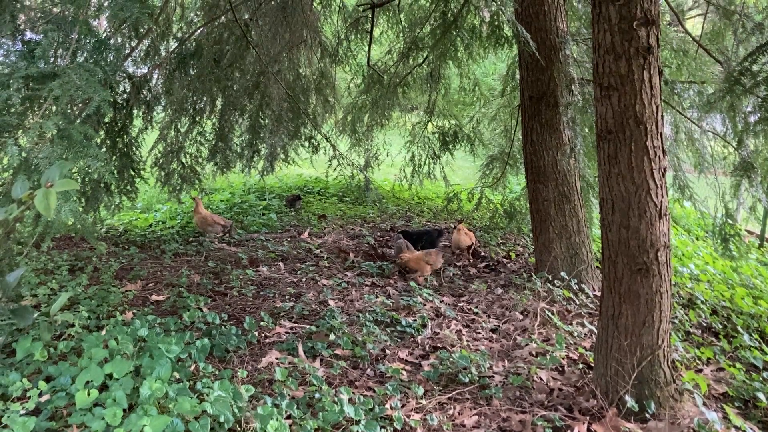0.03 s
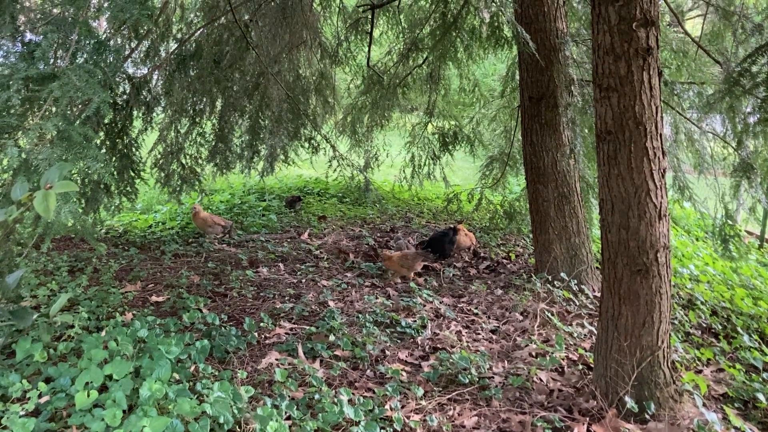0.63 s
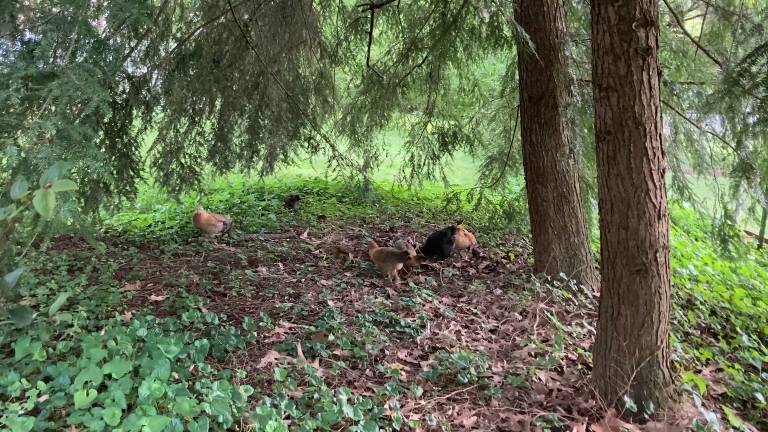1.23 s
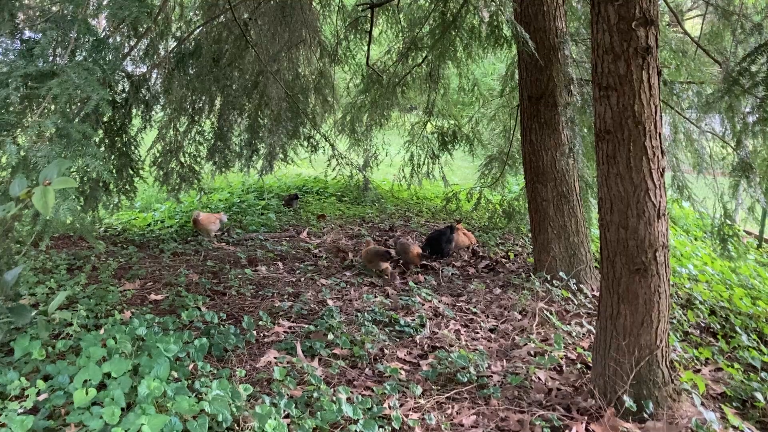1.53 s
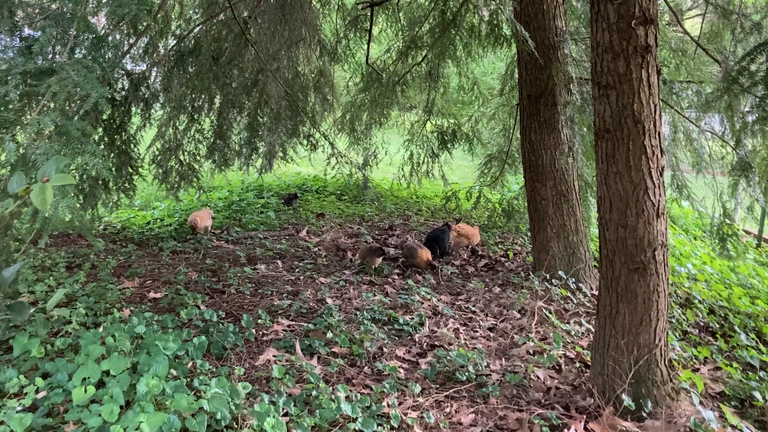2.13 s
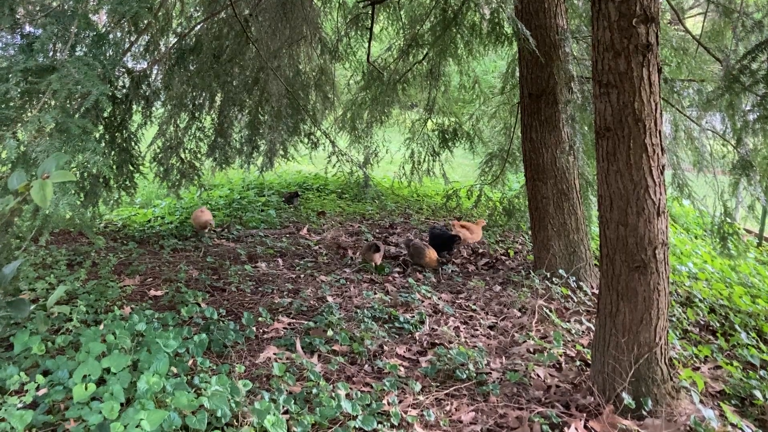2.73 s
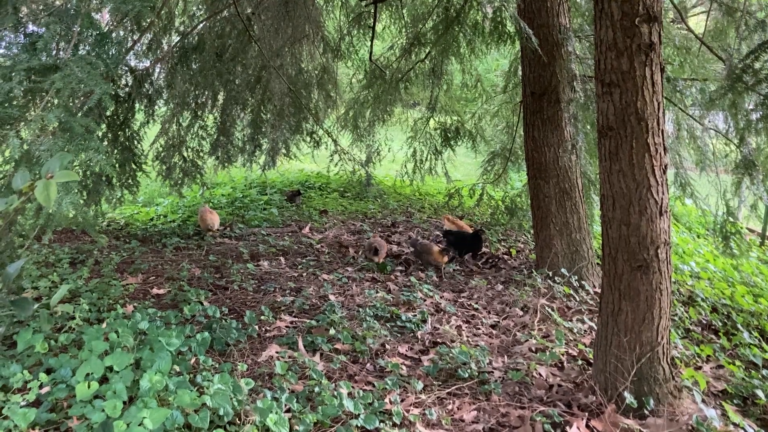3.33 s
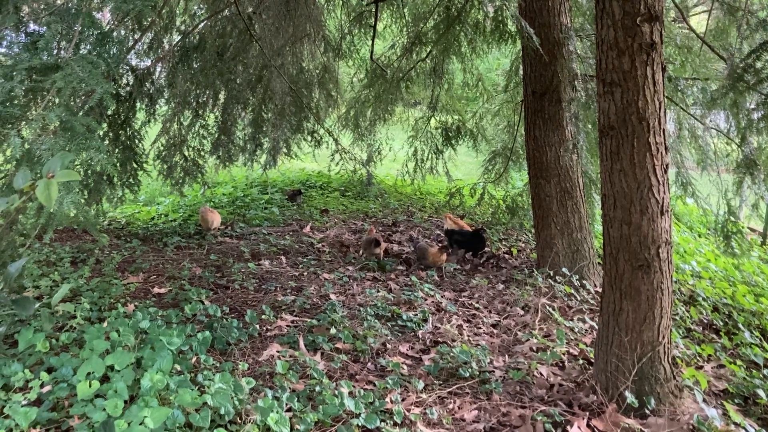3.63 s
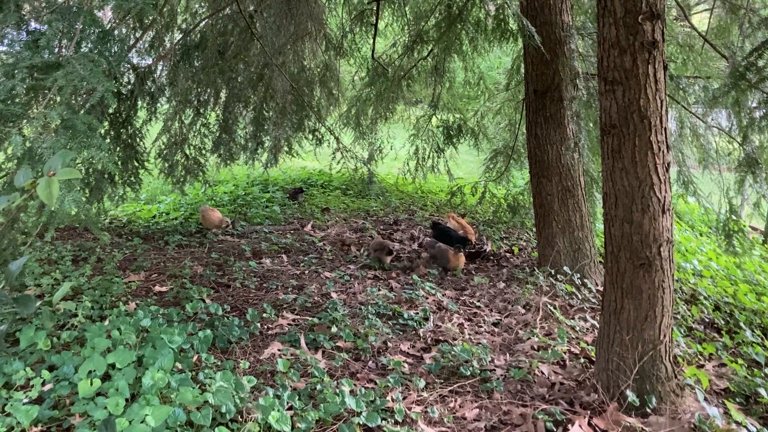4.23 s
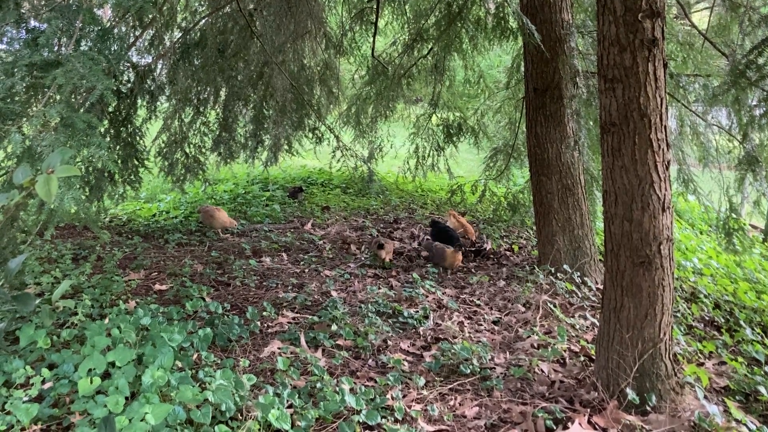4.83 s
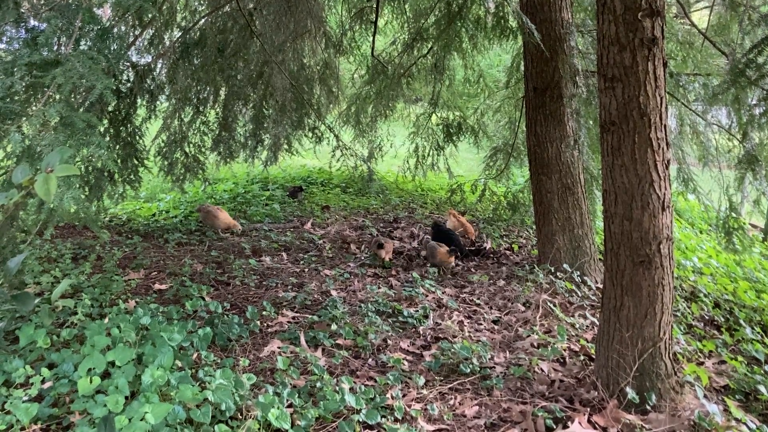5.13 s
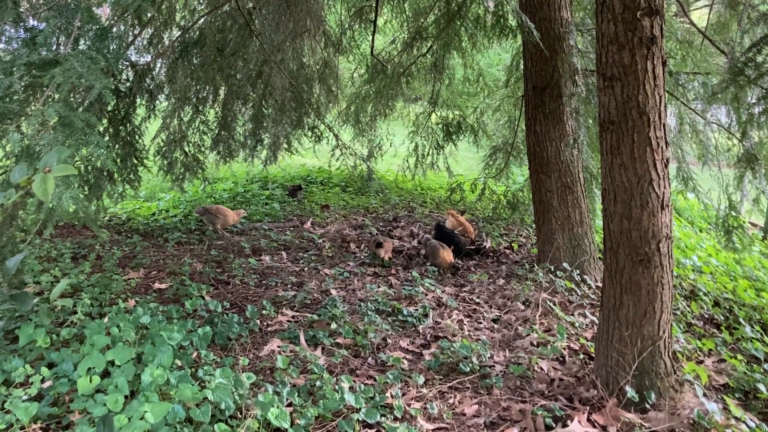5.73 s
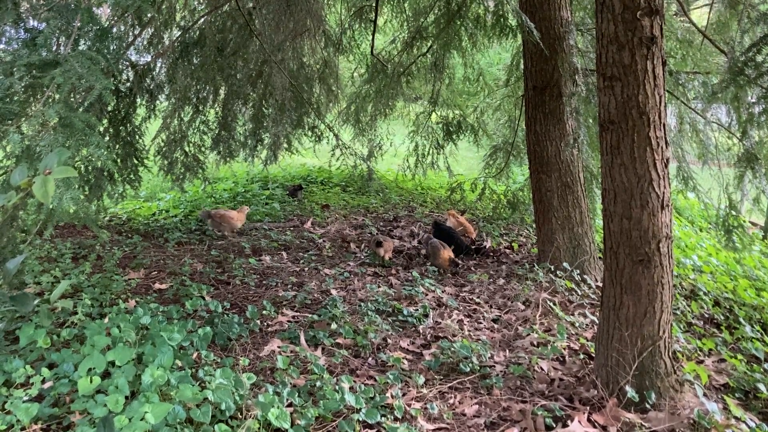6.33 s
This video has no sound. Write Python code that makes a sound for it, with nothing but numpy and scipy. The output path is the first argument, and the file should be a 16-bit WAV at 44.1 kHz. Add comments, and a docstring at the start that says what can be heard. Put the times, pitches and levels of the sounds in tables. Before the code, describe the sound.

Dry leaf litter rustles and twigs snap under softly cheeping chickens, over far birdsong and a low road hum.

```python
"""Young chickens scratching through dry leaf litter under trees, a few metres from a stereo microphone.
Each rake of a foot breaks a shower of tiny crackles; twigs snap and the chickens peep softly.
Farther off to one side birds whistle, their notes trailing away among the trunks.
Behind it all lie the rumble, tyre noise and hum of distant traffic, slowly drawing nearer."""
import sys
import numpy as np
from scipy import signal
from scipy.fft import rfft, irfft
from scipy.io import wavfile

SR = 44100
rng = np.random.default_rng(int(sys.argv[2]) if len(sys.argv) > 2 else 0)


def unload_wav(signal):
    """Save mono or channel-first audio to the path in sys.argv[1] as 16-bit WAV at rate SR, clipped to [-1, 1]."""
    wavfile.write(
        sys.argv[1],
        SR,
        np.round(np.clip(np.atleast_2d(signal).T, -1, 1) * 32767).astype(np.int16),
    )


N = 291060

# colour of a brittle snap: (frequency [Hz], gain [dB])
BRITTLE_COLOUR = [(400, -61), (2500, -19), (4500, -17.5), (8000, -10), (11500, -11.5), (16000, -15.5)]


def leaves(level_db=1.0, slide_db=-13, ground_db=-6, grove_db=-17):
    """Litter underfoot, a few metres off: clumps of crackles over the hiss of leaf sliding on leaf."""
    # colour of the rustle as heard, with a narrow dip near 2.7 kHz: (frequency [Hz], gain [dB])
    rustle_colour = [(150, -2.5), (450, -15.5), (1000, -6), (1600, -9.5), (2100, -6.5), (2700, -15),
                     (3200, -4.5), (4300, 1), (5800, -4), (7500, 0.5), (11000, 1.3), (13000, -5),
                     (16000, -14.5)]
    # how deep the feet dig: (time [s], weight of the low crunch [dB])
    digging = [(0.25, 4), (1, 0.5), (3.7, 0), (5.9, -1), (6.2, -11)]
    force_db = raking()
    crumple = crackles(per_s=3800, spread_db=1.0, cycles=0.44)
    sliding = amp(slide_db) * rng.standard_normal((2, N))
    crumple = coloured(crumple + sliding, rustle_colour)
    ticks = coloured(crackles(per_s=650, spread_db=1.9, cycles=0.6), BRITTLE_COLOUR)
    # a hard rake crumples many leaves at once; a light step breaks them one by one
    crumple_share = np.clip((force_db + 80) / 42, .3, .84)
    rustle = np.sqrt(crumple_share) * unit(crumple) + np.sqrt(1 - crumple_share) * unit(ticks)
    # a foot that digs deep crushes the thick leaves underneath
    crunch = coloured(rustle, [(1500, 7), (5000, -2.5), (9000, -22)])
    rustle += (amp(over_time(digging)) - 1) * crunch
    rustle *= amp(level_db + force_db) * clumps()
    ground = scatter(rustle.mean(0), t60=.015, count=4)
    grove = scatter(rustle.mean(0), t60=0.1)
    return rustle + amp(ground_db) * ground + amp(grove_db) * grove


def raking(grip_share=0.42, settle_s=0.034):
    """Force of the feet in dB: each stroke swells, holds and lets go, then the thrown leaves settle."""
    # rakes of a foot and tosses of leaves: (start [s], length [s], relative level [dB])
    strokes = [(0.01, 0.15, -58), (0.205, 0.062, -51), (0.645, 0.17, -57.5), (1.075, 0.15, -59.5),
               (1.428, 0.23, -59.5), (1.763, 0.15, -58), (1.925, 0.15, -54.5), (2.415, 0.16, -49.5),
               (2.732, 0.22, -46.5), (2.976, 0.096, -42), (3.15, 0.024, -43.5), (3.473, 0.14, -42),
               (3.723, 0.1, -49), (3.825, 0.17, -42.5), (4.088, 0.11, -49), (4.202, 0.052, -41),
               (4.384, 0.028, -46.5), (4.473, 0.061, -46), (4.737, 0.073, -50), (4.851, 0.11, -50),
               (4.988, 0.073, -49), (5.252, 0.1, -63.5), (5.603, 0.077, -60.5), (5.986, 0.03, -58),
               (6.143, 0.13, -62), (6.432, 0.092, -52)]
    # the flock shuffling between strokes: (time [s], relative level [dB])
    shuffling = [(0, -59.5), (0.33, -55), (0.56, -68), (2.35, -64), (2.7, -55), (3.4, -53), (4.3, -49),
                 (4.65, -56), (4.71, -66.5), (5.55, -84), (5.75, -71), (6.35, -67.5), (6.6, -56)]
    t = np.arange(0, N / SR, .002)
    start, length, db = np.transpose(strokes)
    since = t[:, None] - start
    grip = np.clip(since / (grip_share * length), 0, 1)
    settling = np.exp(-np.maximum(since - length, 0) / settle_s)
    power = ((amp(db) * grip * settling) ** 2).sum(1)
    return 10 * np.log10(over_time(np.c_[t, power]) + amp(over_time(shuffling)) ** 2)


def crackles(per_s, spread_db, cycles, litter_db=-5, litter_t60=.014, count=28):
    """Leaf fragments of many sizes crack at random and ring briefly, each echoing off the litter."""
    t, out = np.arange(SR // 50) / SR, np.zeros((2, N))
    impulses = amp(spread_db * np.minimum(rng.exponential(1, N), 4)) * rng.choice([-1, 1], N)
    impulses *= rng.random(N) < per_s / SR
    fragment = rng.integers(0, count, N)
    for k, hz in enumerate(np.linspace(700, 15500, count)):
        ring = np.exp(-t * hz / cycles) * np.sin(2 * np.pi * hz * t)
        paths = rng.standard_normal((2, len(t))) * amp(-60 * t / litter_t60)
        paths *= amp(litter_db) / np.linalg.norm(paths, axis=1, keepdims=True)
        paths[:, 0] += 1  # straight to the microphone
        crack = unit(signal.fftconvolve(ring[None], paths, axes=1)[:, :len(t)])
        out += signal.oaconvolve((impulses * (fragment == k))[None], crack, axes=1)[:, :N]
    return unit(out)


def clumps(per_s=100, fade_s=0.013, spread_db=1.6, steady_db=3.0):
    """Whole leaves give way one after another: each a sudden rise in the crackle that dies quickly."""
    bursts = amp(spread_db * np.minimum(rng.exponential(1, N), 3))
    bursts *= rng.random(N) < per_s / SR
    power = signal.lfilter([1], [1, -np.exp(-2 / (fade_s * SR))], bursts ** 2)
    return unit(np.sqrt(power / power.mean() + amp(steady_db) ** 2))


def snaps(level_db=21, splinter_t60=.028, grove_db=-17):
    """A brittle piece breaks with one sharp crack and a short splintering."""
    # pecks, snapping twigs and stiff leaves: (time [s], relative level [dB])
    breaks = [(0.3477, -35.5), (0.416, -43), (0.4823, -40.5), (0.6604, -43.5), (0.681, -44), (0.728, -40),
              (0.757, -38), (0.784, -35), (0.797, -40), (1.0067, -46), (1.586, -44), (1.9994, -39),
              (2.201, -39.5), (2.2684, -46), (2.877, -39), (3.143, -32), (3.166, -28), (3.173, -28.5),
              (3.3804, -39), (3.5516, -29), (3.71, -30.5), (3.741, -35), (3.787, -29.5), (4.0766, -46),
              (4.24, -31), (4.339, -34), (4.4284, -30.5), (4.765, -40), (4.988, -38), (4.9944, -29.5),
              (5.0128, -33.5), (5.449, -44), (5.724, -47), (5.766, -49.5), (5.875, -41), (6.441, -38.5),
              (6.4986, -47)]
    t, out = np.arange(SR // 20) / SR, np.zeros(N)
    splintering = amp(-12 - 60 * t / splinter_t60)
    for start, db in breaks:
        crack = splintering * rng.standard_normal(len(t))
        crack[0] = 1
        add(out, start, amp(db + level_db) * crack)
    out = coloured(out, BRITTLE_COLOUR)
    return out + amp(grove_db) * scatter(out, t60=0.21)


def chickens(level_db=-0.5, pips_db=-3, near_db=-4, grove_db=-6):
    """Soft calls from the flock, roughened by echoes off ground and trunks; pips carry more directly."""
    # cheeps that flick up and slide down: (start [s], length [s], top pitch [Hz], relative level [dB])
    cheep_calls = [(0, 0.019, 2460, -58.5), (0.025, 0.05, 3800, -63.5), (0.84, 0.095, 3760, -63),
                   (1.11, 0.041, 3500, -64), (1.415, 0.032, 2750, -64), (1.782, 0.066, 3380, -60.5),
                   (1.912, 0.061, 2600, -58), (1.917, 0.065, 3730, -57.5), (2.11, 0.094, 3740, -59.5),
                   (2.568, 0.057, 3450, -62), (2.915, 0.038, 2700, -74), (3.152, 0.056, 3660, -54),
                   (3.21, 0.048, 2950, -53.5), (3.3, 0.078, 3760, -56), (4.65, 0.025, 2510, -61)]
    # soft arched peeps: (start [s], length [s], top pitch [Hz], relative level [dB])
    peep_calls = [(0.54, 0.08, 2260, -63), (0.671, 0.078, 2310, -62.5), (0.795, 0.047, 3850, -67.5),
                  (0.821, 0.082, 2280, -64.5), (0.978, 0.074, 2220, -65), (1.283, 0.054, 4040, -62),
                  (1.33, 0.044, 4000, -63), (1.84, 0.093, 2920, -64), (1.85, 0.051, 3860, -66),
                  (2.336, 0.155, 2830, -63), (2.715, 0.17, 2620, -56.5), (3.405, 0.038, 2450, -62),
                  (3.635, 0.17, 2675, -57.5)]
    # pips that dip in the middle: (start [s], length [s], pitch near the dip [Hz], relative level [dB])
    pip_calls = [(0.955, 0.036, 1460, -64), (2.206, 0.0494, 1248, -49.5), (2.742, 0.048, 3160, -53),
                 (5.103, 0.0325, 1326, -47)]
    # pitch at even steps through each kind of call: (share of the listed pitch [ratio])
    cheep_bend = (0.86, 1.0, 0.96, 0.87, 0.8, 0.76)
    peep_bend = (0.84, 0.92, 1.0, 0.91, 0.82)
    pip_bend = (1.21, 0.97, 1.11)
    cheeps = notes(bent(cheep_calls, cheep_bend), waver=.016, flutter_db=2.4, second_db=-17, swell_db=10)
    soft_calls = bent(peep_calls, peep_bend) + bent(twitter(), peep_bend, flatter_beyond_s=0.0162)
    peeps = notes(soft_calls, waver=.014, flutter_db=3, second_db=-18)
    pips = amp(pips_db) * notes(bent(pip_calls, pip_bend), waver=.008, flutter_db=1.0, second_db=-26)
    voice = amp(level_db) * (cheeps + peeps)
    echoing = voice + pips / 2
    nearby = scatter(echoing, t60=.09)
    grove = scatter(echoing, t60=1.0)
    return voice + trunk_echo(voice) + pips + amp(near_db) * nearby + amp(grove_db) * grove


def twitter(note_s=0.027, stray=0.071, uneven_db=7, max_notes=32):
    """Strings of tiny notes from the flock, uneven in time, pitch and strength."""
    # runs of notes: (start [s], length [s], first pitch [Hz], last pitch [Hz], relative level [dB])
    runs = [(2.102, 0.5, 2146, 2100, -66), (2.318, 0.13, 3270, 3260, -70), (3.297, 0.06, 2490, 2540, -55.5),
            (6.278, 0.19, 2840, 3420, -75.5)]
    calls = []
    for start, length, first, last, db in runs:
        pitches = np.linspace(first, last, round(length / note_s))
        chance = rng.uniform(-1, 1, (max_notes, 3))
        for k, (hz, (late, sharp, loud)) in enumerate(zip(pitches, chance)):
            onset = start + note_s * (k + late / 2)
            calls.append((onset, note_s, hz * (1 + stray * sharp), db + uneven_db * loud))
    return calls


def bent(calls, bend, flatter_beyond_s=.095):
    """Calls of one kind share a pitch bend, flatter in long ones; gives (start, pitch curve, level)."""
    shape = np.polyfit(np.linspace(0, 1, len(bend)), bend, len(bend) - 1)
    curves = []
    for start, length, hz, db in calls:
        ratio = np.polyval(shape, np.linspace(0, 1, round(length * SR)))
        depth = min(1, flatter_beyond_s / length)
        curves.append((start, hz * ratio ** depth, db))
    return curves


def notes(calls, waver, flutter_db, second_db, taper=0.4, swell_db=0):
    """A bird's nearly pure voice: each note follows its pitch curve, trembles and fades at both ends."""
    out = np.zeros(N)
    tremble, flutter = wander(hz=119), wander(hz=58.6)
    for start, hz, db in calls:
        at = np.clip(round(start * SR) + np.arange(len(hz)), 0, N - 1)
        phase = 2 * np.pi * np.cumsum(hz * (1 + waver * tremble[at])) / SR
        tone = np.sin(phase) + amp(second_db) * np.sin(2 * phase)
        loudness_db = flutter_db * flutter[at] + np.linspace(0, swell_db, len(hz))
        envelope = signal.windows.tukey(len(hz), taper) * amp(loudness_db)
        add(out, start, amp(db) * unit(tone * envelope))
    return out


def far_birds(glide_s=0.105, direct_db=7.0, grove_db=5.0):
    """Birds farther off to one side: each whistle lingers, glides and trails away among the trees."""
    # drawn-out whistles: (start [s], length [s], first pitch [Hz], goal pitch [Hz], relative level [dB])
    whistles = [(0.482, 0.33, 2500, 3190, -71), (0.855, 0.11, 8540, 6950, -78),
                (1.011, 0.25, 2523, 3144, -68.5), (1.543, 0.25, 2400, 3200, -67.5),
                (4.823, 0.15, 3140, 2980, -65.5), (5.301, 0.17, 3220, 3080, -71)]
    calls = []
    for start, length, first, goal, db in whistles:
        lingering = np.exp(-(np.arange(0, length, 1 / SR) / glide_s) ** 2)
        calls.append((start, goal + (first - goal) * lingering, db))
    voice = notes(calls, waver=.015, flutter_db=2.2, second_db=-41, taper=.45)
    direct = np.array([np.roll(voice, 4), voice])  # reaches the left channel a moment later
    grove = scatter(voice, t60=.55)
    return amp(direct_db) * direct + trunk_echo(voice, echo_db=-13) + amp(grove_db) * grove


def trunk_echo(x, echo_db=-11, delay_s=0.025):
    """One distinct reflection off the nearest trunks, so that every glide overlaps itself."""
    return amp(echo_db) * np.pad(x, (round(delay_s * SR), 0))[:N]


def scatter(x, t60, count=3):
    """Echoes off ground, trunks and branches die by 60 dB in t60 seconds and shift as the birds move."""
    t, out = np.arange(SR // 2) / SR, np.zeros((2, N))
    shares = np.array([wander(hz=4) for _ in range(count)])
    for share in shares / np.linalg.norm(shares, axis=0):
        taps = rng.standard_normal((2, len(t))) * amp(-60 * t / t60)
        taps /= np.linalg.norm(taps, axis=1, keepdims=True)
        out += signal.oaconvolve((x * share)[None], taps, axes=1)[:, :N]
    return out


def traffic(rumble_db=-50, rumble_swell=0.5, hum_hz=131, hum_db=-55.0):
    """A distant road: tyre noise and engine rumble swell together; one motor hums unsteadily."""
    # the traffic drawing nearer: (time [s], tyre level [dB])
    approach = [(0, -62), (2.6, -61), (4, -58), (5.5, -57.5), (6.6, -54.5)]
    # colour of far tyres and open air: (frequency [Hz], gain [dB])
    tyre_colour = [(200, 4.5), (520, -7.5), (950, 3), (1300, 2.5), (1700, -3), (2200, -7), (3200, -6),
                   (4500, -16.5), (8000, -35), (16000, -105)]
    # colour of far engines: (frequency [Hz], gain [dB])
    engine_colour = [(25, -61), (43, -8.5), (62, 0), (125, 0), (210, -10), (280, -11.5), (370, -22.5),
                     (520, -31), (900, -57)]
    tyre_db = over_time(approach)
    tyres = outdoor_noise(tyre_colour) * amp(tyre_db + wander(hz=21))
    rumble = outdoor_noise(engine_colour) * amp(rumble_db + rumble_swell * (tyre_db - tyre_db.mean()))
    motor_hz = hum_hz * (1 + 0.0118 * wander(hz=4.15))
    phase = 2 * np.pi * np.cumsum(motor_hz) / SR
    hum = np.sin([phase, phase + .6]) * amp(0.78 * wander(hz=1.6))
    return tyres + rumble + amp(hum_db) * unit(hum)


def outdoor_noise(colour):
    """Noise from all around the microphone: alike in both channels in the bass, less so higher up."""
    # likeness of left and right: (frequency [Hz], correlation [-1 to 1])
    likeness = [(80, 1), (130, 0.56), (290, 0.93), (550, -0.16), (1000, 0.53), (1800, -0.48), (4000, -0.33)]
    left, independent = rfft(rng.standard_normal((2, N)))
    same = np.clip(over_pitch(likeness), -1, 1)
    right = same * left + np.sqrt(1 - same ** 2) * independent
    return unit(coloured(irfft(np.array([left, right]), N), colour))


def amp(db):
    """Decibels to gain."""
    return 10 ** (np.asarray(db) / 20)


def unit(x):
    """Scales to an rms of one."""
    return x / np.sqrt(np.mean(x ** 2) + 1e-20)


def over_time(rows):
    """Joins (time [s], value) rows by straight lines."""
    return np.interp(np.arange(N) / SR, *np.transpose(rows))


def over_pitch(rows):
    """Joins (frequency [Hz], value) rows on a log-frequency axis, for every bin of the spectrum."""
    hz, value = np.transpose(rows)
    return np.interp(np.log(np.fft.rfftfreq(N, 1 / SR) + 1), np.log(hz), value)


def coloured(x, colour):
    """Filters a sound by (frequency [Hz], gain [dB]) rows."""
    return irfft(rfft(x) * amp(over_pitch(colour)), N)


def wander(hz):
    """Smooth random drift with an rms of one, mostly slower than hz."""
    smoothing = np.exp(-(np.fft.rfftfreq(N, 1 / SR) / hz) ** 2)
    return unit(irfft(rfft(rng.standard_normal(N)) * smoothing, N))


def add(mix, start_s, sound):
    """Mixes a sound in at start_s."""
    part = mix[max(round(start_s * SR), 0):][:len(sound)]
    part += sound[:len(part)]


def scene():
    """The flock in the leaves, birds beyond it, traffic far behind."""
    return leaves() + snaps() + chickens() + far_birds() + traffic()


def record(dry, lag_s=.000219, edge_hz=15850):
    """In the top treble the left channel repeats the right, inverted and a little late; then a low-pass."""
    left, right = rfft(dry)
    hz = np.fft.rfftfreq(N, 1 / SR)
    treble = over_pitch([(6000, 0), (6600, 1)])
    repeat = -right * np.exp(-2j * np.pi * hz * lag_s)
    left = (1 - treble) * left + treble * repeat
    stereo = irfft(np.array([left, right]), N)
    low_pass = signal.firwin(801, edge_hz, window=("kaiser", 9), fs=SR)
    return signal.oaconvolve(stereo, low_pass[None], "same", axes=1)


dry = scene()
out = record(dry)
unload_wav(out)
```